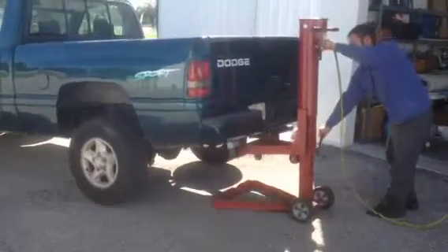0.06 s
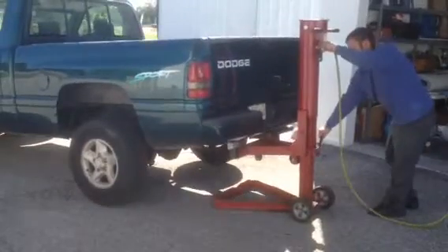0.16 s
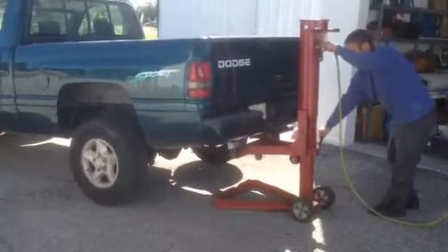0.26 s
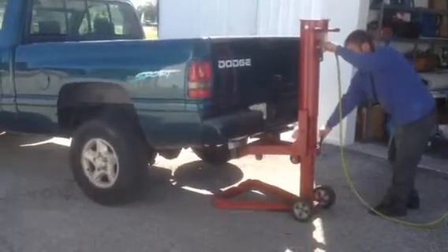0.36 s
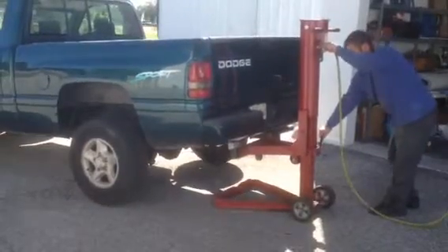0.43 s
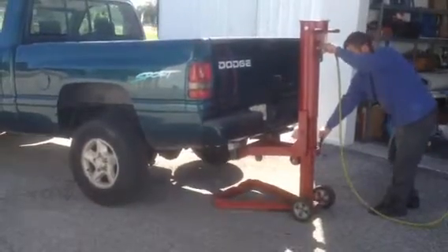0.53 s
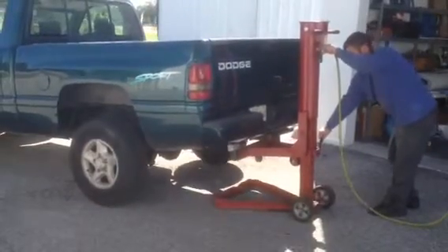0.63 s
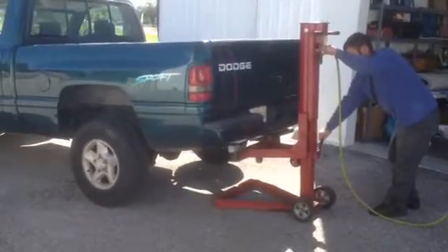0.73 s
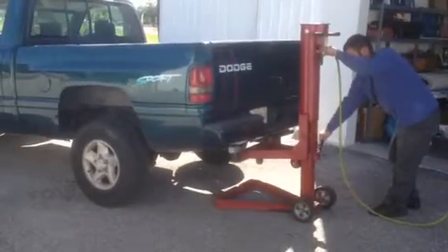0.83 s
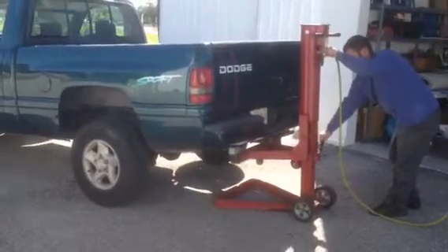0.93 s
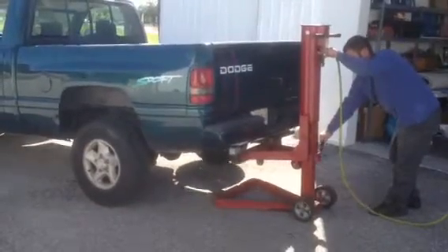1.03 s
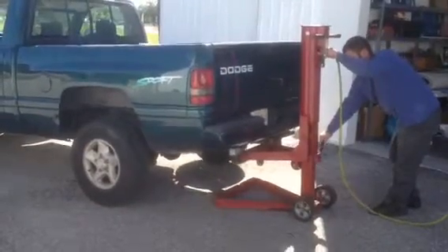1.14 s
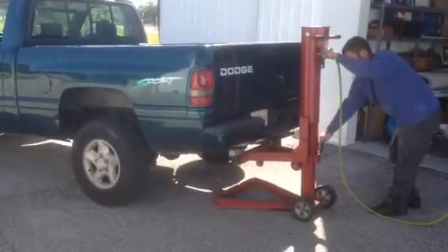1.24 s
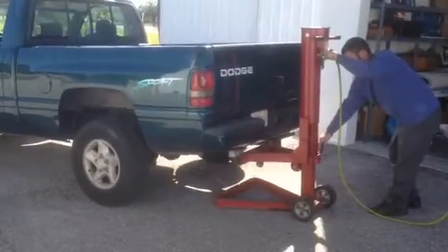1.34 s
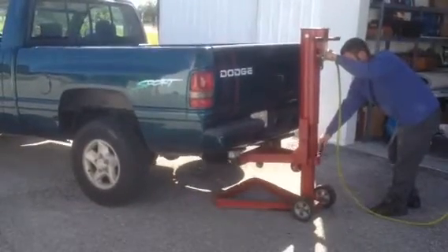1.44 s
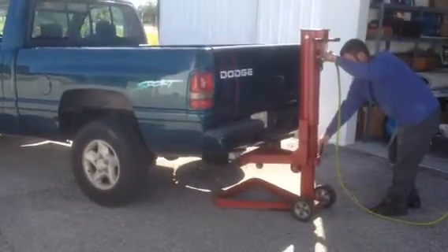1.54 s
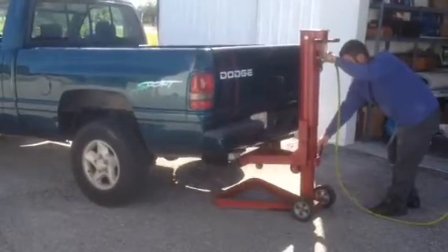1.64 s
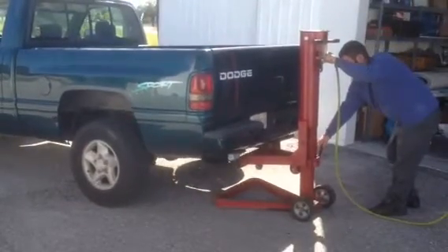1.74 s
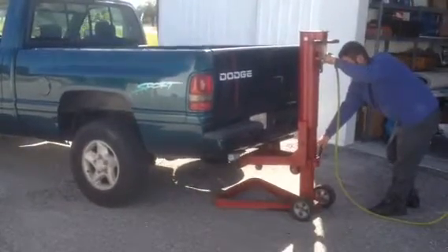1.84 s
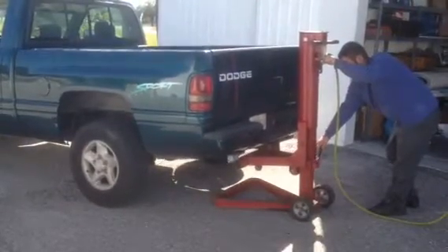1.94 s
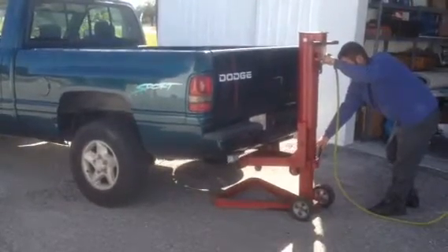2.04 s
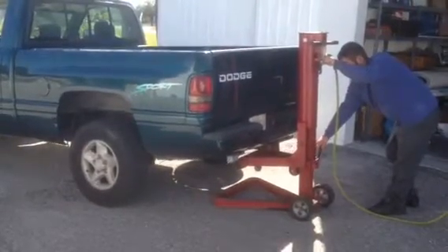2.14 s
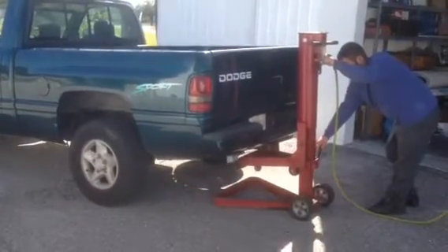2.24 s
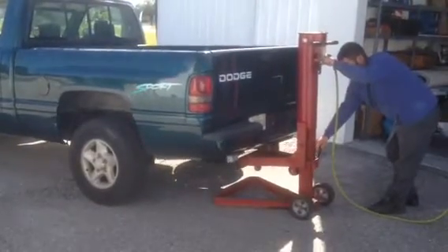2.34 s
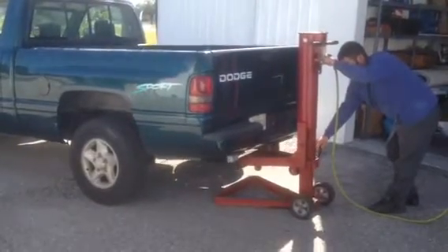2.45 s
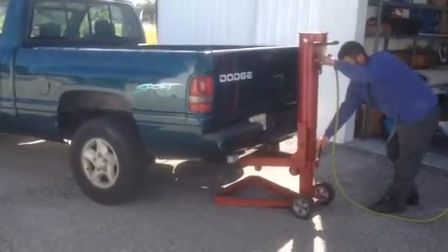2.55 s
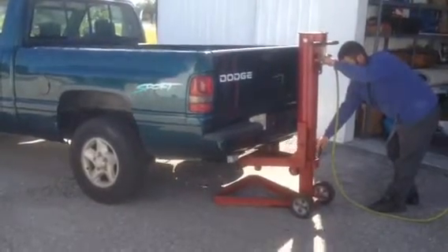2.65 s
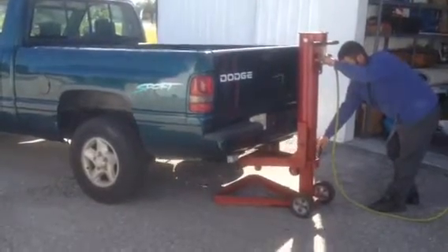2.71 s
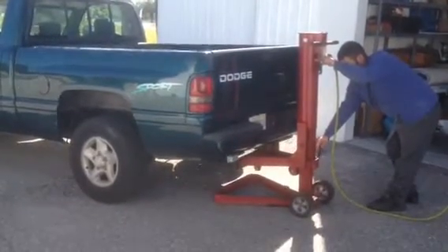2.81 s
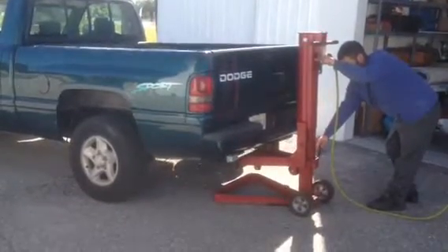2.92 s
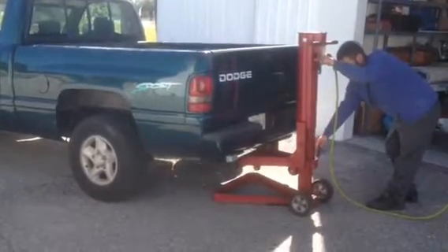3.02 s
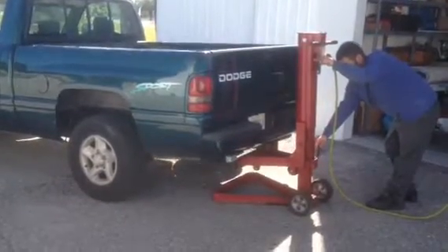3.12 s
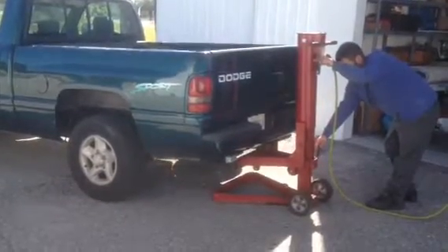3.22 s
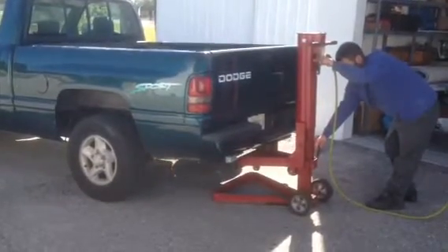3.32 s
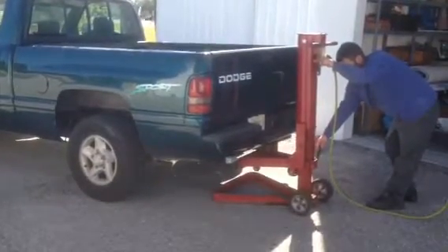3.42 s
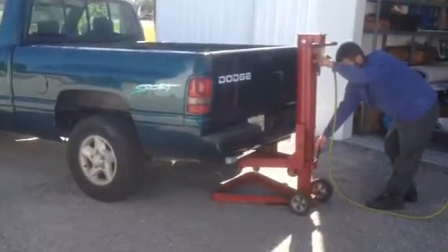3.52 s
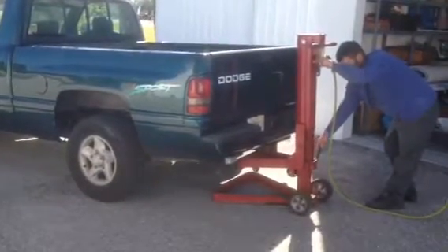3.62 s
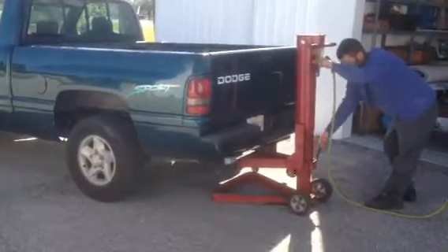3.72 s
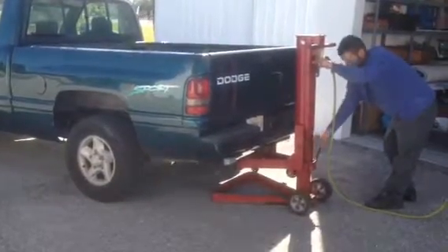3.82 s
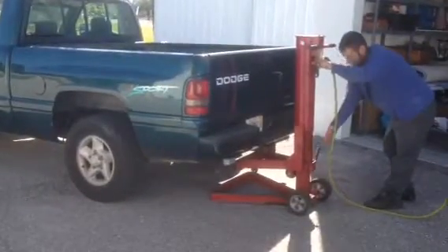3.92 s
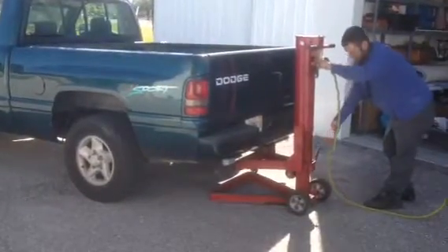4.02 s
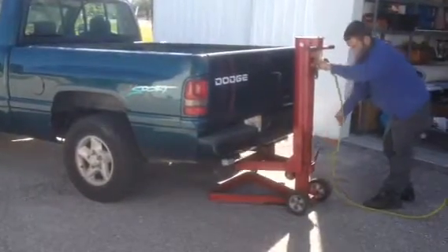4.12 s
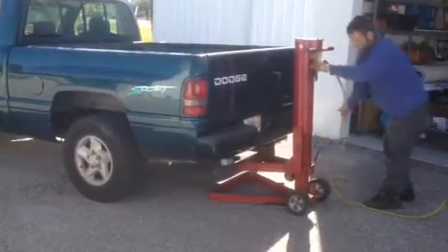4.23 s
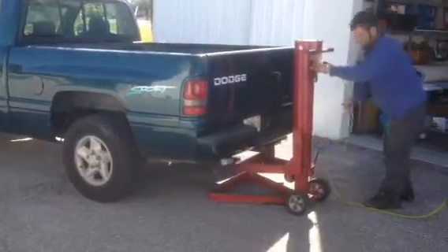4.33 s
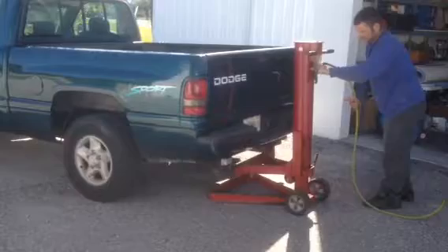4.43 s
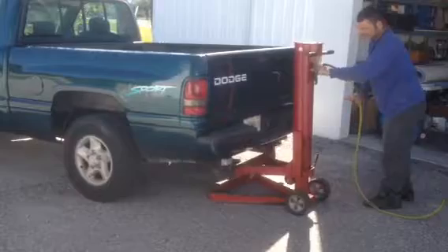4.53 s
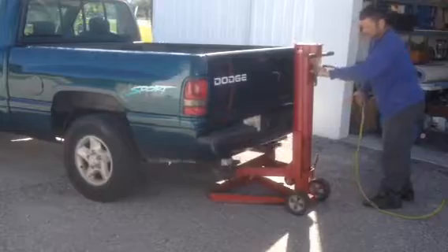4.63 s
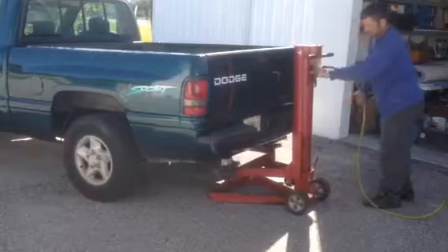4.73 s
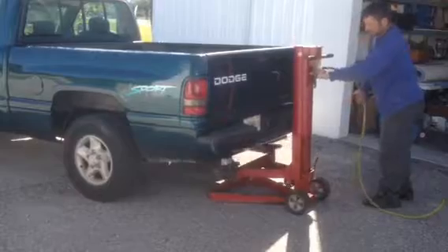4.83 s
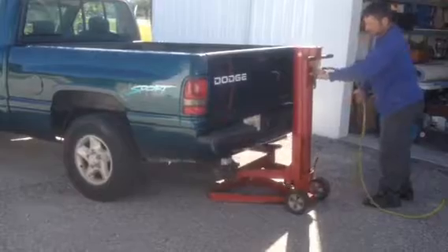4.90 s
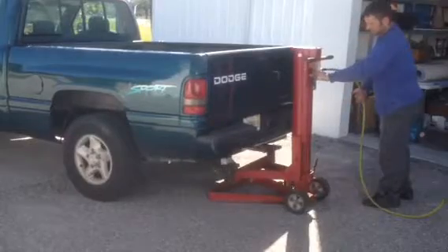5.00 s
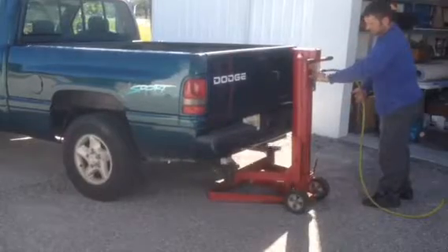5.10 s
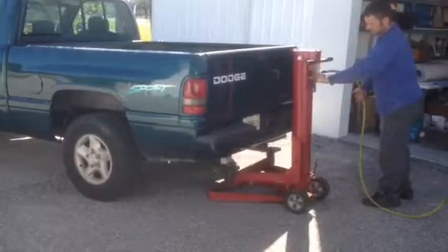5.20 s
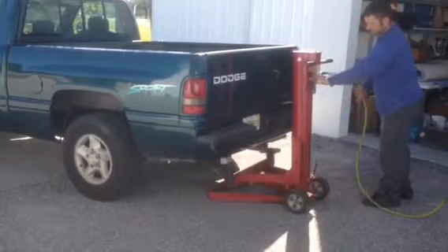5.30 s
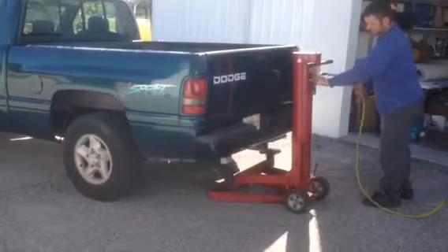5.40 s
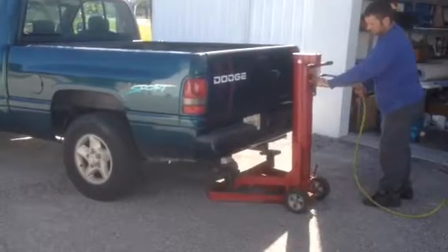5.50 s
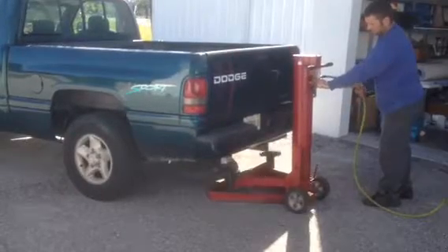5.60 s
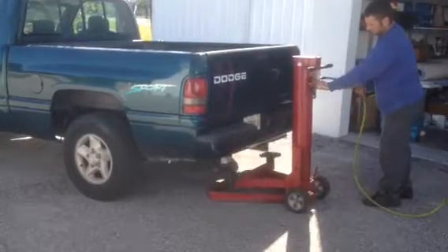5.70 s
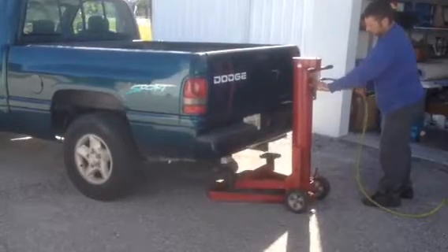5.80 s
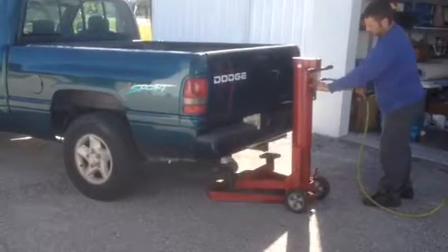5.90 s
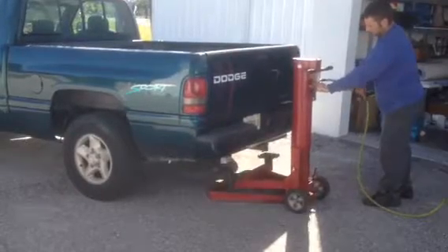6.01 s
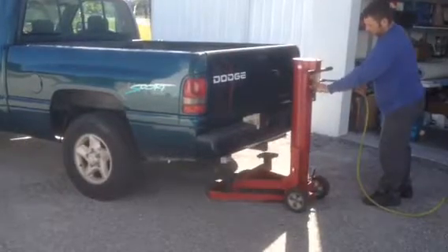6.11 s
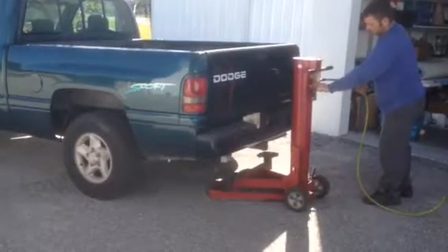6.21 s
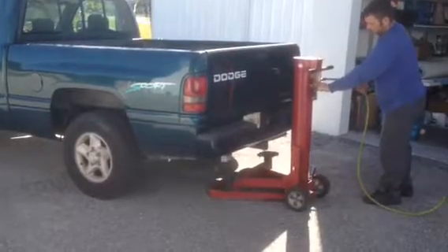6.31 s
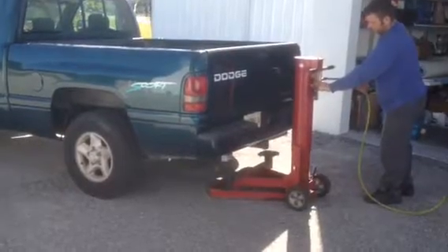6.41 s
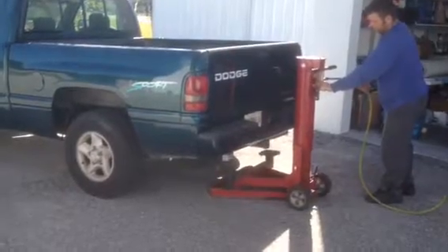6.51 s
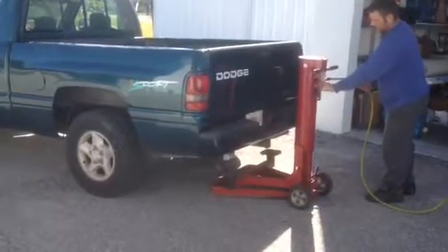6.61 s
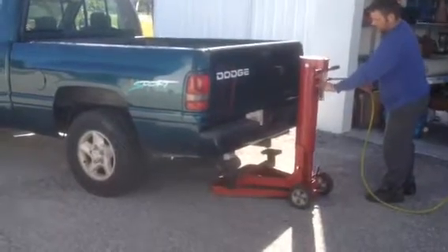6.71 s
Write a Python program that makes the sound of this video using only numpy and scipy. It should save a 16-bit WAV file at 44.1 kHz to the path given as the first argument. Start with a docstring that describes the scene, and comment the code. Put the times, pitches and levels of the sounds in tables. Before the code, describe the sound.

Compressed air hisses loudly from a jack lowering a pickup truck, dulls, then dies away with a metal clunk.

```python
"""An air jack vents its cylinder and lets a pickup truck down, outside a workshop, a few metres from
a hand-held microphone. The jet hisses through the valve ports and dulls as the pressure falls;
nearby steel and the yard echo it. The carriage lands on its stop with a clunk and the air thins
to a trickle. Soft low bumps sound now and then over a faint outdoor rumble."""
import sys
import numpy as np
from scipy import signal
from scipy.fft import rfft, irfft
from scipy.io import wavfile
from scipy.ndimage import uniform_filter1d

SR = 44100
rng = np.random.default_rng(int(sys.argv[2]) if len(sys.argv) > 2 else 0)


def to_wav(s):
    """Save 16-bit WAV."""
    ch = np.atleast_2d(s).T  # columns
    pcm = np.round(np.clip(ch, -1, 1) * 32767)  # PCM
    wavfile.write(sys.argv[1], SR, pcm.astype(np.int16))


N = 297675
T = np.arange(N) / SR
HZ = np.arange(N // 2 + 1) * SR / N + 1e-3
TOP_HZ = 15300  # upper edge of the hiss and of the microphone


def undb(db):
    """Decibels to gain."""
    return 10 ** (np.asarray(db) / 20)


def unit(x):
    """Scale to rms 1."""
    return x / np.sqrt(np.mean(x ** 2))


def curve(points):
    """Straight lines in time through (time_s, value) points."""
    return np.interp(T, *np.transpose(points))


def colour(points):
    """Gain per frequency from (frequency_hz, level_db) points."""
    hz, db = np.transpose(points)
    return undb(np.interp(np.log(HZ), np.log(hz), db))


def resonance(hz, width_hz):
    """Complex response of one mode, 1 at its centre."""
    return 1 / (1 + 1j * (HZ ** 2 - hz ** 2) / (HZ * width_hz))


def ringing(modes):
    """Gain per frequency of a set of modes, summed in power."""
    return np.sqrt(sum(np.abs(undb(db) * resonance(hz, width)) ** 2 for hz, width, db in modes))


def shaped(x, gain):
    """Filter by a gain per frequency."""
    return irfft(rfft(x) * gain, N)


def noise(gain):
    """Noise of a given colour, rms 1."""
    return unit(shaped(rng.standard_normal(N), gain))


def wander(rate_hz):
    """Smooth random drift, rms 1."""
    hold = max(int(SR / rate_hz), 1)
    steps = np.repeat(rng.standard_normal(N // hold + 1), hold)
    return unit(uniform_filter1d(uniform_filter1d(steps, hold), hold)[:N])


def blows(events, rise_s=0.013):
    """Envelope of a series of blows that each swell and die away within a second."""
    power = np.zeros(N)
    for start_s, db, decay_s in events:
        span = slice(int(start_s * SR), int(start_s * SR) + SR)
        age = np.maximum(T[span] - start_s, 0)
        rise = np.minimum(age / rise_s, 1)
        fall = np.exp(-np.maximum(age - rise_s, 0) / decay_s)
        power[span] += (undb(db) * rise * fall) ** 2
    return np.sqrt(power)


def yard_rumble(level_db=-53, swell_db=1.1):
    """The open yard: a faint rumble that swells a little."""
    # outdoor background: frequency_hz, level_db
    spectrum = [(25, -34), (50, -20), (90, -8), (140, -4), (195, 2.5), (250, -1.5), (400, -2), (600, -4.5),
                (1000, -6), (2000, -15.5), (4000, -27), (15000, -40)]
    return noise(colour(spectrum)) * undb(level_db + swell_db * wander(9))


def bumps(faint_db=-55, scatter_db=2.5, faint_decay_s=0.04, faint_count=14):
    """Dull, short thuds with no ring; fainter ones fall at random among the clear ones."""
    # the clear bumps: start_s, level_db, decay_s
    clear = [(0.075, -41.5, 0.037), (0.16, -39.5, 0.15), (0.764, -50, 0.22), (1.222, -47.5, 0.019),
             (2.76, -44, .035), (6.525, -48, .02), (6.567, -44, .03), (6.647, -37, 0.043)]
    # colour of a bump: frequency_hz, level_db
    spectrum = [(30, -44), (70, -26), (130, -5.5), (185, 2), (270, -4), (400, -13), (800, -30), (2000, -55)]
    faint = [(when * T[-1], faint_db + scatter_db * (2 * size - 1), faint_decay_s)
             for when, size in rng.random((faint_count, 2))]
    return noise(colour(spectrum)) * blows(list(clear) + faint)


def yard_echoes(x, wet_db=-13, t60_s=0.14, gap_s=0.006):
    """Ground, truck and workshop wall scatter the sound into a short, dense tail."""
    age = T[:SR // 3]
    tail = rng.standard_normal(len(age)) * np.exp(-np.log(1000) * age / t60_s) * (age > gap_s)
    echoes = signal.fftconvolve(x, tail / np.linalg.norm(tail))[:N]
    return (x + undb(wet_db) * echoes) / np.hypot(1, undb(wet_db))


def steel_echoes(x, move_mid_s=4.77, move_ease_s=0.81, closing_db=5, sway_share=0.0047, oversample=4):
    """Nearby steel combs the hiss; as truck and microphone shift, the teeth deepen and most slide up."""
    # echo paths: first_delay_ms, last_delay_ms, relative_db
    paths = [(0.413, 0.364, -30.5), (1.38, 1.25, -22.5), (1.245, 1.19, -22.5), (1.65, 1.35, -26),
             (2.188, 1.85, -23.5), (2.63, 2.03, -15), (3.1, 3.2, -20), (5.4, 5.9, -15.5)]
    moved = 1 / (1 + np.exp(-(T - move_mid_s) / move_ease_s))
    sway = 1 + sway_share * wander(1.98)
    # narrow steel parts throw back treble better than the long waves that bend around them
    reflected = shaped(x, colour([(1000, -16), (5000, -0.5), (12000, -0.5)]))
    fine = signal.resample_poly(reflected, oversample, 1)
    echoes = np.zeros(N)
    for first_ms, last_ms, db in paths:
        delay_ms = (first_ms + moved * (last_ms - first_ms)) * sway
        read_at = (np.arange(N) - delay_ms * SR / 1000) * oversample
        echoes += undb(db) * np.interp(read_at, np.arange(len(fine)), fine, left=0)
    return unit(x + undb(closing_db * moved) * echoes) * np.std(x)


def carriage(hum_db=-20, hum_decay_s=0.18, hum_width_hz=25):
    """Each knock is a short clatter of loose steel that rings the frame; its lowest mode hums on."""
    # the carriage knocks in its column: start_s, level_db, decay_s
    knocks = [(4.035, -36, 0.095), (5.962, -37, 0.054), (6.156, -24.3, 0.03), (6.23, -34.5, 0.036)]
    # modes of the frame: pitch_hz, width_hz, level_db
    frame = [(267, 33, -18), (435, 76, -2), (565, 77, 3), (724, 53, 3.5), (961, 50, -4), (1160, 100, -1.5),
             (1470, 170, -1.5), (1730, 64, -2), (2080, 120, -2)]
    contact = colour([(80, -25), (260, 1.5), (2100, 2.5), (4000, -6), (12000, -16)])
    clatter = noise(ringing(frame) * contact) * blows(knocks)
    hum_envelope = blows([(start_s, db + hum_db, hum_decay_s) for start_s, db, _ in knocks])
    return clatter + noise(resonance(frame[0][0], hum_width_hz)) * hum_envelope


def trickle(waver_db=1.5):
    """The last air seeps through the valve seat with a faint, hollow whisper."""
    # the seeping air: time_s, level_db
    seep = [(5.9, -73), (6.1, -42), (6.3, -39), (6.49, -50), (6.75, -40.5)]
    # modes of the seat: pitch_hz, width_hz, level_db
    seat = [(624, 130, -4), (1420, 220, 1), (1880, 310, -1), (2600, 320, -13), (4200, 200, -9.5),
            (4700, 390, -7), (6100, 300, -11), (7160, 680, -12.5), (12200, 3400, -17)]
    return noise(ringing(seat)) * undb(curve(seep) + waver_db * wander(25))


def surging():
    """Swing in dB as the flow surges slowly and evenly while the piston sinks."""
    # first loaded, then free: first_crest_s, end_s, rate_hz, depth_db
    surges = [(0.24, 2.8, 3.3, 0.54), (4.43, 5.95, 2.87, .65)]
    swing_db = np.zeros(N)
    for crest_s, end_s, rate_hz, depth_db in surges:
        cycles = (T - crest_s) * rate_hz
        fade = np.clip(2 * cycles + 1, 0, 1) * np.clip((end_s - T) * rate_hz, 0, 1)
        swing_db += depth_db * fade * np.cos(2 * np.pi * cycles)
    return swing_db


def emptying(empty_s=6.226, decay_s=0.06):
    """Once the piston has landed nothing pushes the air, and the jet collapses."""
    return np.exp(-np.maximum(T - empty_s, 0) / decay_s)


def port_colour(ports, depth=1):
    """The ports put bell-shaped peaks and notches on the jet's spectrum."""
    # smooth colour of the jet: frequency_hz, level_db
    spectrum = [(300, -37), (480, -25.5), (600, -11), (950, -11.5), (1350, -5.5), (2600, -3.5), (3500, -7),
                (4200, -4), (5700, -4), (7200, 1.5), (9300, -4), (12200, -1), (14000, -3), (15500, -5)]
    peaks_db = sum(db / (1 + (2 * (HZ - hz) / width) ** 2) for hz, width, db in ports)
    return colour(spectrum) * undb(depth * peaks_db)


def jet(clear_at_db=-3.5, slack_at_db=-9, choked_depth=0.67, land_s=5.96, land_takes_s=0.13):
    """Turbulence rings the ports, more clearly as the pressure drops; then it turns dull and hollow."""
    # air pressure against full load, falling as the tyres take the weight: time_s, pressure_db
    pressure = [(0, -0.65), (0.6, 0.37), (1.6, -2), (2.65, -3.5), (3.3, -5), (3.8, -7), (4.22, -9.5),
                (4.45, -8.5), (5.95, -8)]
    # resonances of column and valve: pitch_hz, width_hz, gain_db
    ports = [(765, 83, 11.5), (1050, 40, 7), (1292, 31, 6), (1443, 66, 3), (1494, 85, 2), (1874, 33, 11),
             (1980, 23, 7), (2100, 20, 5.5), (2360, 84, 6.5), (3020, 140, 6.5), (3910, 220, 4),
             (4310, 100, 4), (4650, 110, 4.5), (4790, 110, 5.5), (6670, 280, 1), (8300, 220, 4.5),
             (12260, 320, 3.5), (12900, 300, -3)]
    # resonances and notches of the slack flow: pitch_hz, width_hz, gain_db
    slack_ports = [(756, 91, 9.5), (857, 77, 4.5), (1280, 280, 3.5), (1880, 140, 5.5), (2810, 160, 4),
                   (3740, 400, -3), (4185, 120, 3), (4534, 200, 7), (4820, 130, 6), (5400, 140, 5.5),
                   (5560, 160, -6.5), (7000, 780, 3.5), (8700, 450, -1.5), (11800, 550, 3.5),
                   (13460, 250, 4), (14400, 1600, -5)]
    # eddy sizes, from the hollow of the column to the finest spray:
    # low_hz, full_load_db, db_per_pressure_db, clear_lift_db, landed_change_db, surge_share
    eddies = [(100, -39.5, 0.21, 2.5, -5, 0.4), (1030, -27, 0.79, 4.0, -3, 0.4),
              (3450, -18, 1.03, 0, -5.5, 0.8), (9100, -16.5, 1.36, 2.5, -11, .4)]
    pressure_db = curve(pressure)
    choked = np.clip(1 - pressure_db / clear_at_db, 0, 1)
    slack = np.clip((pressure_db - clear_at_db) / (slack_at_db - clear_at_db), 0, 1)
    clear = 1 - choked - slack
    stages = [(choked, port_colour(ports, choked_depth)),
              (clear, port_colour(ports)),
              (slack, port_colour(slack_ports))]
    landed = np.clip((T - land_s) / land_takes_s, 0, 1)  # the piston ends its travel and the flow drops
    surge_db = surging()
    sputter_db = 0.27 * wander(90)  # the whole jet sputters together
    upper_edges = [row[0] for row in eddies[1:]] + [SR / 2]
    hiss = np.zeros(N)
    for (low_hz, full_db, slope, lift_db, landed_db, surge_share), high_hz in zip(eddies, upper_edges):
        band = (HZ < TOP_HZ) / np.sqrt((1 + (low_hz / HZ) ** 20) * (1 + (HZ / high_hz) ** 20))
        turbulence = rfft(rng.standard_normal(N)) * band
        rush = sum(share * unit(irfft(turbulence * gain, N)) for share, gain in stages)
        db = full_db + slope * pressure_db + lift_db * clear + landed_db * landed + surge_share * surge_db
        waver_db = 0.47 * wander(55)  # each eddy size wavers on its own
        hiss += rush * undb(db + sputter_db + waver_db)
    return hiss


def scene():
    """The jack from a few metres on one microphone, so both channels are alike."""
    vented = jet() * emptying() + trickle()
    air = yard_echoes(steel_echoes(vented))
    mono = air + carriage() + bumps() + yard_rumble()
    return np.array([mono, mono])


def record(dry):
    """The hand-held microphone's channel cuts the top steeply."""
    return signal.sosfilt(signal.ellip(12, 0.1, 80, TOP_HZ, fs=SR, output="sos"), dry)


dry = scene()
out = record(dry)
to_wav(out)
```